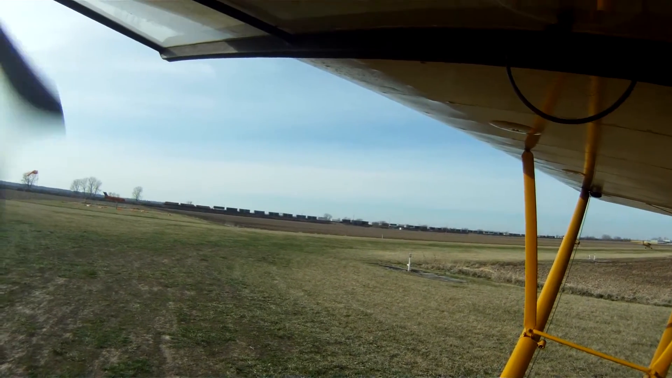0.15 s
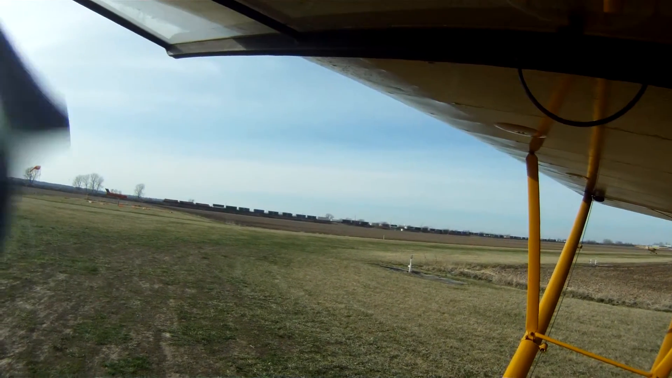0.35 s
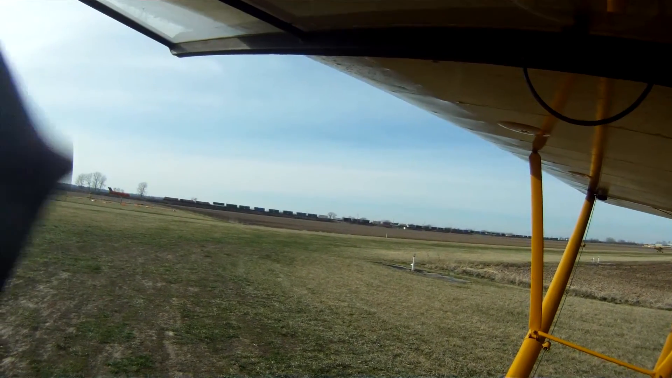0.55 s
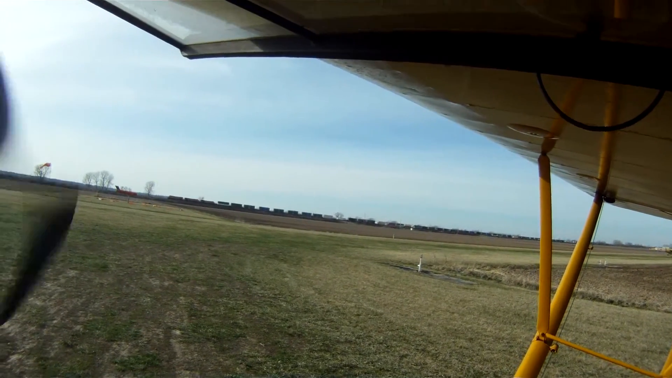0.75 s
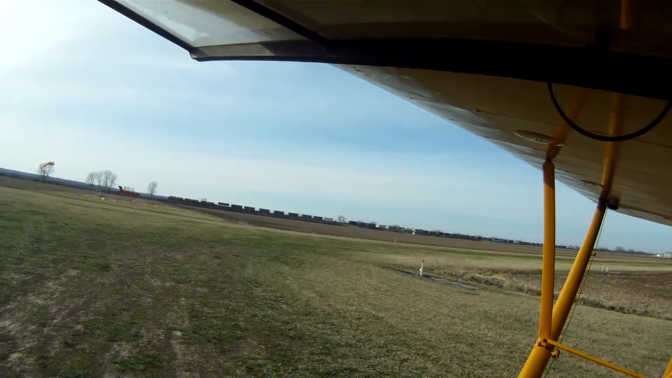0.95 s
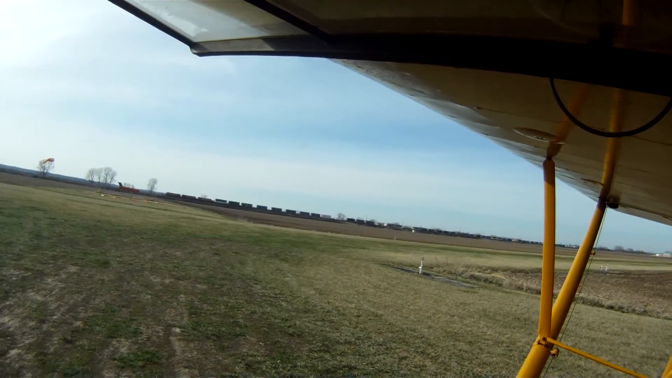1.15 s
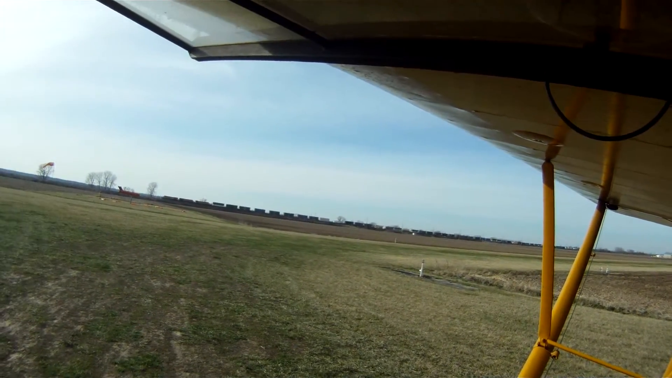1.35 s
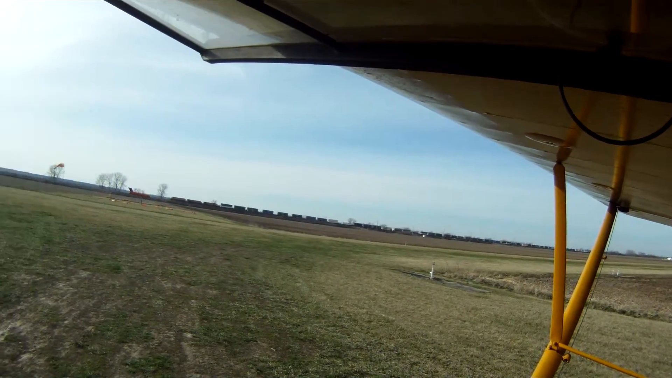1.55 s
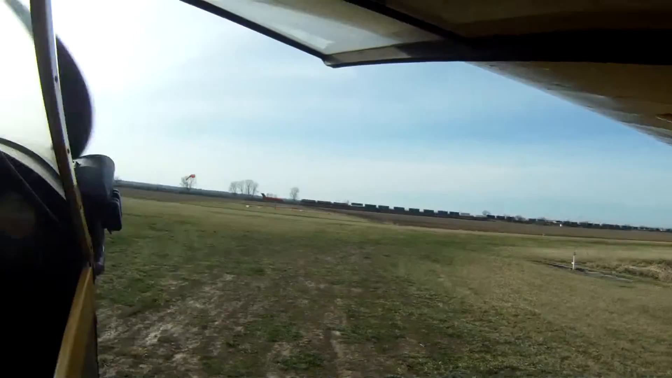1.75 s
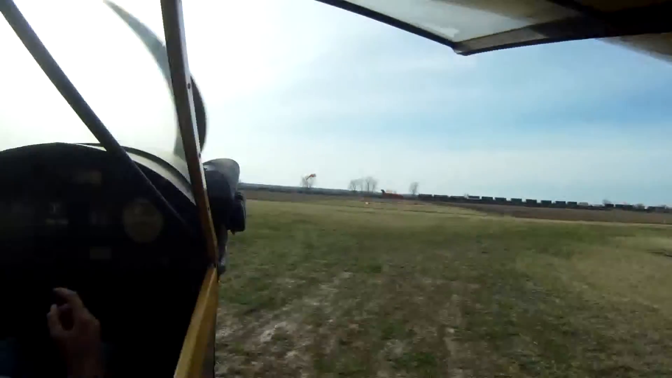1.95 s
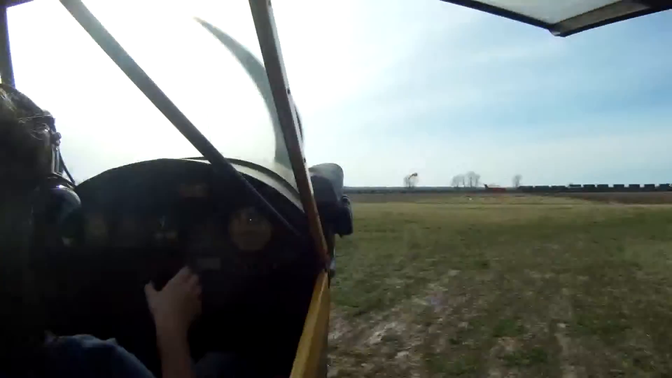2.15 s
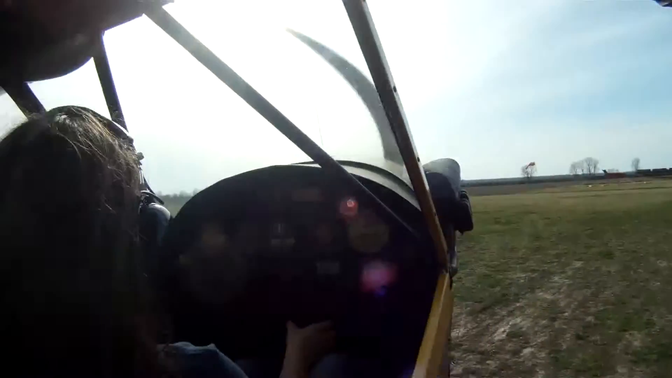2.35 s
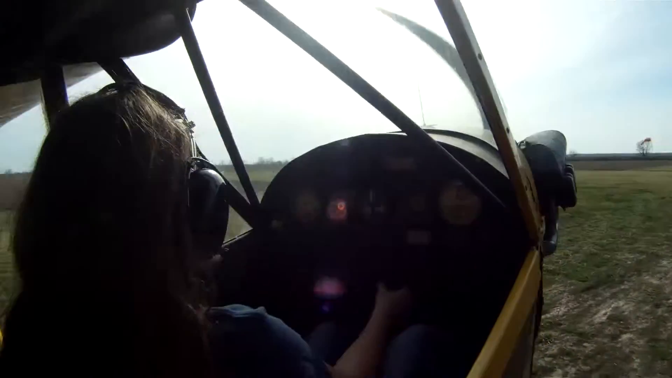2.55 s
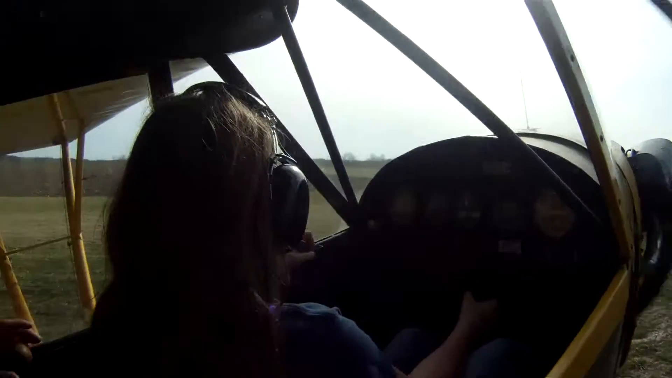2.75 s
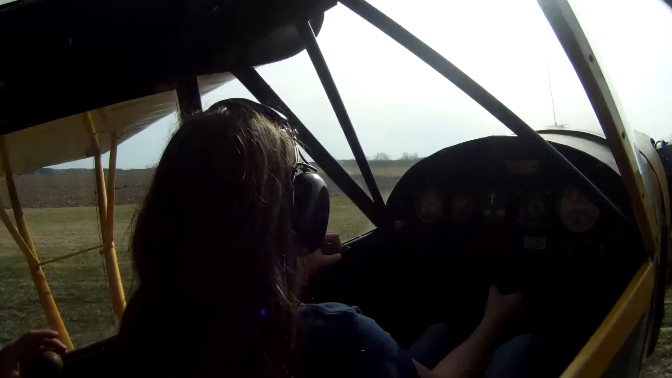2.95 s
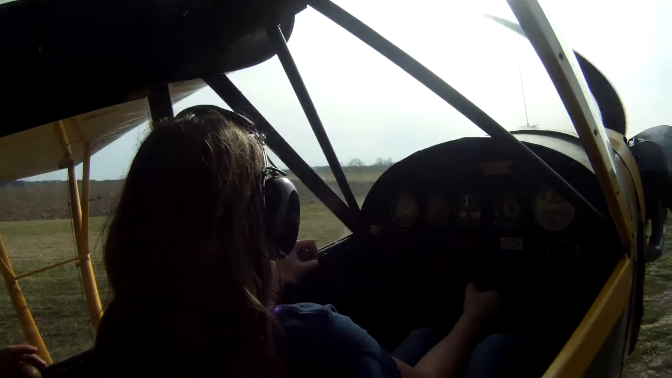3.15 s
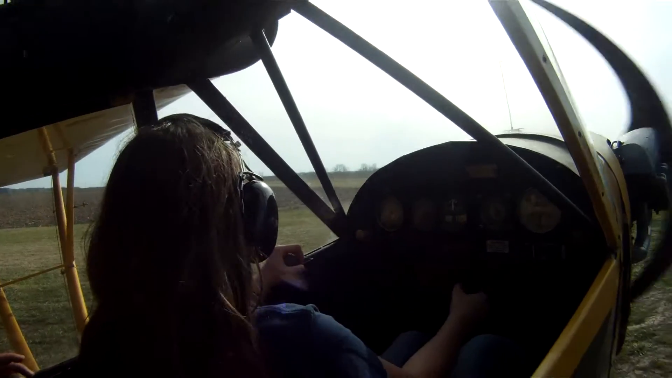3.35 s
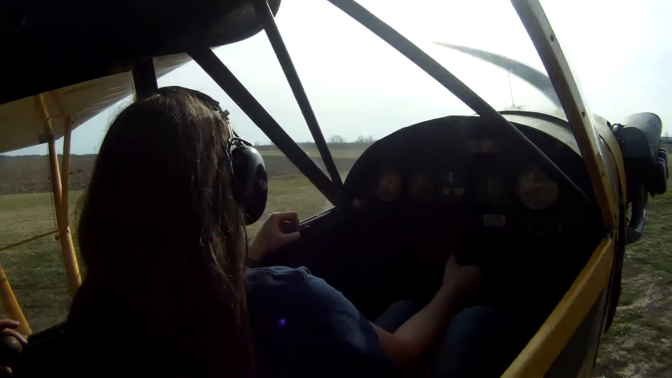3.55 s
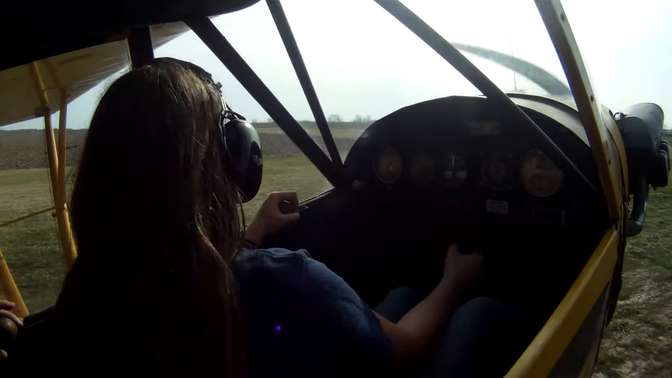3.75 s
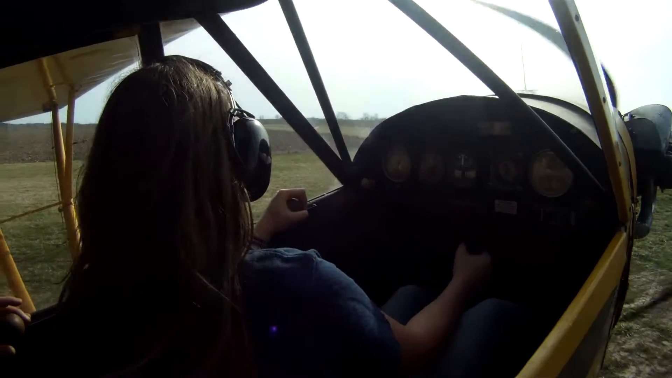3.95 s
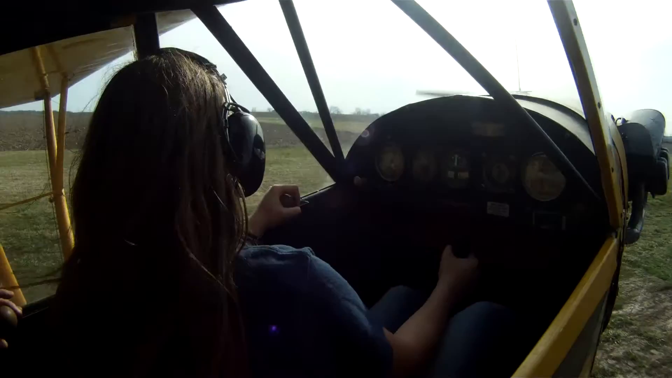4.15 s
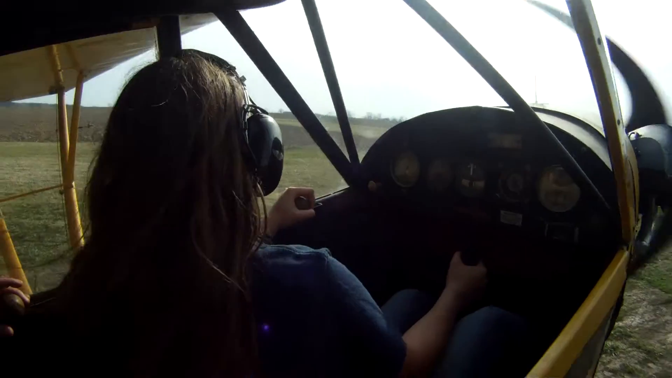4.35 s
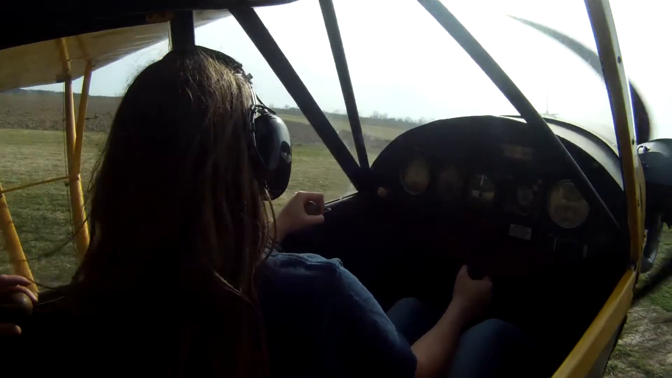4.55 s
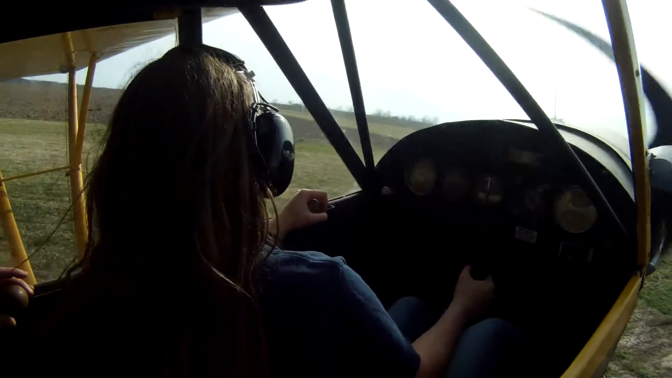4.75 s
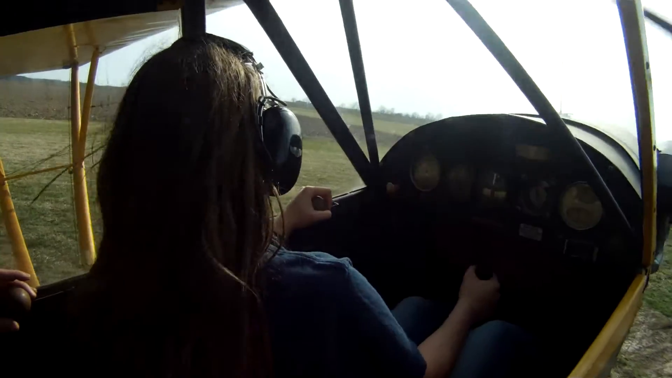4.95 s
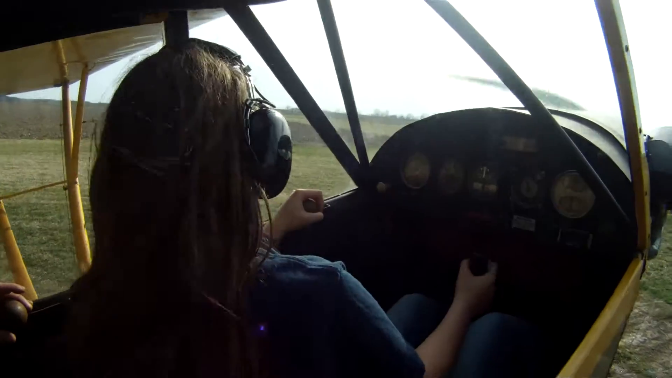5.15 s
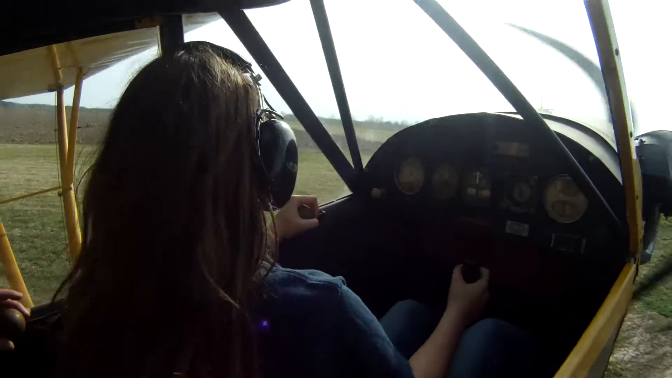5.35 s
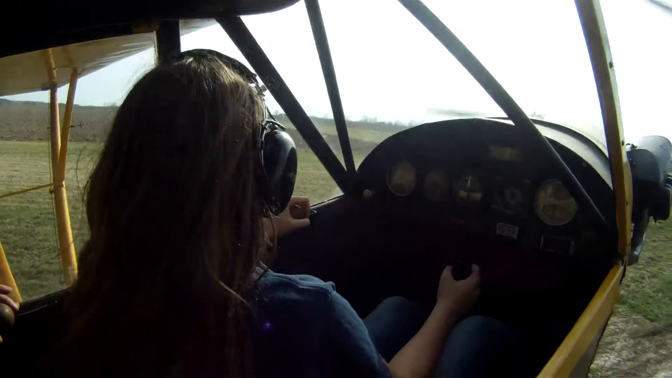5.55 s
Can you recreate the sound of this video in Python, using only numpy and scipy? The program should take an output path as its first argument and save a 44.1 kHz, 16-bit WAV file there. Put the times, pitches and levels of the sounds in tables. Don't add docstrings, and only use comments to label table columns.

```python
import sys
import numpy as np
from scipy import signal
from scipy.fft import rfft, irfft
from scipy.io import wavfile
from scipy.ndimage import uniform_filter1d

SR = 44100
rng = np.random.default_rng(int(sys.argv[2]) if len(sys.argv) > 2 else 0)


def elevation(decibels):
    levels = np.asarray(decibels, float)
    return 10 ** (levels / 20)


def wrap_up_sound(samples):
    columns = np.atleast_2d(samples).T
    tamed = np.clip(columns, -1, 1)
    steps = np.round(tamed * 32767).astype(np.int16)
    wavfile.write(sys.argv[1], SR, steps)


N = 247401


def in_time(rows):
    s, *columns = np.vstack(rows).T
    return [np.interp(np.arange(N) / SR, s, c) for c in columns]


def rms_one(x):
    return x / np.sqrt(np.mean(x ** 2) + 1e-20)


def drift(rate_hz):
    r = np.exp(-2 * np.pi * rate_hz / SR)
    noise = rng.standard_normal(N + SR)
    return rms_one(signal.lfilter([1], [1, -2 * r, r * r], noise)[SR:])


def butter(x, order, hz, kind="low"):
    return signal.sosfilt(signal.butter(order, hz, kind, fs=SR, output="sos"), x)


def resonate(drive, modes, power, noisy=True):
    out = np.zeros(N)
    for k, (hz, width_hz, idle_db, power_db) in enumerate(modes):
        r = np.exp(-np.pi * width_hz / SR)
        x = drive * rng.standard_normal(N) if noisy else (-1) ** k * drive
        ring = [1, -2 * r * np.cos(2 * np.pi * hz / SR), r * r]
        band = signal.lfilter([1 - r * r, 0, r * r - 1], ring, x)
        out += elevation(idle_db + power * (power_db - idle_db)) * band
    return out


def evened(x, level_db):
    return elevation(level_db) * x / np.sqrt(uniform_filter1d(x ** 2, size=SR // 3))


def turned(half_s, length_s, before, after):
    share = .5 + .5 * np.tanh((np.arange(N) / SR - half_s) / max(length_s, .005))
    return before + share * (after - before)


def puffs(turn, once_db, twice_db, lags, uneven_db, grain_db):
    strength = np.clip(1 + .12 * rng.standard_normal(400), 0, 2)[(turn + .45).astype(int)]
    once = once_db * np.cos(2 * np.pi * (turn - lags[0]))
    twice = twice_db * np.cos(4 * np.pi * (turn - lags[1]))
    return elevation(strength * (once + twice) + uneven_db + grain_db * drift(550.0))


# [f/Hz, width/Hz, idle level/dB, power level/dB]
CAVITY_MODES = [(970, 300, -14, -9.5), (1250, 150, -4, 0.5), (1510, 220, -14.5, -8.5)]
PORT_MODES = [(2010, 257, -4.5, -0.5), (2182, 340, -8, -0.5), (2580, 330, -28, -4.5)]


def hiss(turn, power, beat, shared_db, facing):
    cavity = puffs(turn, 3 * beat, beat, (.96, .9), shared_db + .6 * drift(20.), 1.5)
    port = puffs(turn, 1.3 + .7 * power, 1.5 * beat - .6 * power, (.97, .83), shared_db + .6 * drift(20.), 1.5)
    out = facing ** 0.27 * resonate(cavity, CAVITY_MODES, power) + resonate(port, PORT_MODES, power)
    return butter(out, 3, [950, 2700], "band")


# [f/Hz, width/Hz, idle level/dB, power level/dB]
EDGE_MODES = [(3290, 590, -8, 6.5), (3990, 510, -15, 1), (5130, 660, -13.5, -0.5)]
WHISTLE_MODE = [(3650, 150, -2., 10.5)]
# [half-way t/s, length/s, power share before, after]
EDGE_WAKING = (2.15, -1, 0., 0.3)


def edge_tones(turn, power, beat, shared_db, facing):
    drive = puffs(turn, 1.3 * beat, 1.2 * beat, (.17, .26), shared_db + .3 * drift(20.), 2)
    awake = np.maximum(power, turned(*EDGE_WAKING))
    out = resonate(drive, EDGE_MODES, awake) + facing * resonate(drive, WHISTLE_MODE, power)
    return butter(out, 3, 2950, "high")


# [f/Hz, width/Hz, idle level/dB, power level/dB]
FLUTTER_MODES = [(268, 198, 0, 3.5), (550, 440, 0.5, -5.5), (836, 230, -8, 1.5)]


def flutter(turn, power, beat, shared_db):
    uneven_db = .7 * shared_db + .7 * drift(12.)
    drive = puffs(turn, 3.2 * beat - 1.5 * power, beat - .6 * power, (.04, .98), uneven_db, 2.2)
    return butter(resonate(drive, FLUTTER_MODES, power), 2, [180, 1050], "band")


# [start t/s, end t/s, level/dB]
LEVEL_STEPS = [(2.65, 2.735, 1.5), (2.803, 2.818, 2), (3.543, 3.572, -2), (3.678, 3.697, -3.5),
               (3.827, 3.839, -5.), (4.04, 4.048, -5), (4.087, 4.143, 2.), (4.172, 4.195, -5),
               (4.205, 4.206, -33), (4.332, 4.363, -5.), (4.406, 4.417, 4.5), (4.571, 4.572, -31),
               (4.74, 4.755, -8), (4.809, 4.817, -13), (4.851, 4.864, -5.5), (4.94, 4.964, -3.5),
               (4.998, 5.015, -7), (5.071, 5.085, -8), (5.091, 5.103, -13.5), (5.106, 5.15, 0.5),
               (5.15, 5.18, -7.5), (5.204, 5.213, -14), (5.368, 5.385, -9), (5.496, 5.515, -5.5),
               (5.581, 5.62, -6.5)]


def lulls():
    steps_db = np.zeros(N + SR)
    for start, end, change_db in LEVEL_STEPS:
        steps_db[round(start * SR):round(end * SR)] += change_db
    return uniform_filter1d(steps_db[:N], size=SR // 130)


# [t/s, level/dB]
WASH_LEVEL = [(0, -34), (1.0, -34), (2.0, -36.5), (2.3, -36), (2.58, -33), (2.69, -29.5), (2.84, -29),
              (3.1, -27.5), (3.26, -24.5), (3.4, -24), (3.95, -24), (4.35, -21), (4.5, -19), (4.7, -22),
              (4.8, -19.5), (5.15, -21), (5.45, -19.5), (5.61, -20.5)]
# [half-way t/s, length/s, level/dB before, after]
EDGE_BALANCE = (2.5, 1.4, -12.5, -6.5)
FLUTTER_BALANCE = (2, 1.3, -10., -8.5)


def slipstream(turn, power):
    t = np.arange(N) / SR
    shared_db = (.2 + .8 * power) * drift(25.) + .6 * drift(70.)
    beat = np.interp(t, [0, 2.4], [1.4, .75])
    facing = elevation(-10. * np.exp(-((t - 2.84) / .73) ** 2))
    step_gain = elevation(lulls())
    level_db = in_time(WASH_LEVEL)[0] - .2
    out = evened(step_gain * hiss(turn, power, beat, shared_db, facing), level_db)
    edge = step_gain * edge_tones(turn, power, beat, shared_db, facing)
    out += evened(edge, level_db - in_time(WASH_LEVEL)[0] + in_time(WASH_LEVEL)[0] * 0 + turned(*EDGE_BALANCE)
                  + in_time(WASH_LEVEL)[0])
    flaps = step_gain ** 1.1 * flutter(turn, power, beat, shared_db)
    return out + evened(flaps, level_db + turned(*FLUTTER_BALANCE))


def exhaust(turn, power):
    barks = np.zeros(N) + 1e-18
    firing = np.flatnonzero(np.diff(np.floor(turn + .17)))
    uneven_db = 2 * rng.standard_normal(len(firing))
    barks[firing] = elevation(in_time(WASH_LEVEL)[0][firing] + 27 - 5 * power[firing] + uneven_db)
    ring = resonate(barks, CAVITY_MODES + PORT_MODES, power, noisy=False)
    return ring + elevation(-6) * resonate(barks, FLUTTER_MODES, power, noisy=False)


# [multiple of firing rate, idle level/dB, power level/dB], both relative to the buffet
FIRING_ORDERS = [(1, -7., -14.), (1.5, -20., -14.), (2, -10., -18.), (3, -8., -25.), (4, -13., -26.),
                 (6, -16., -30.)]


def firing_hum(turn, power, level_db):
    out = np.zeros(N)
    for order, idle_db, power_db in FIRING_ORDERS:
        order_db = level_db + idle_db + power * (power_db - idle_db) + 3 * drift(3)
        out += elevation(order_db) * np.sin(2 * np.pi * order * turn + order)
    return out


# [half-way t/s, length/s, level/dB before, after]
BUFFET_BALANCE = (1.5, 0.5, -10, -5.)
# [t/s, peak level/dB, push or pull, width/ms]
GUSTS = [(2.577, -14., 1, 2.2), (2.652, -21.0, 1, 2.6), (2.784, -12.5, -1, 2.), (3.014, -19.2, -1, 5.4),
         (3.284, -18.2, -1, 3.2), (3.323, -18.3, 1, 2.5), (3.351, -17.0, 1, 3.3), (3.443, -15.4, -1, 5.6),
         (3.578, -16.4, -1, 3.1), (3.873, -14.6, 1, 2.9), (3.981, -14.6, 1, 2.9), (4.093, -14.7, -1, 3.7),
         (4.365, -12.4, 1, 2.9), (4.429, -10.2, 1, 2.9), (4.524, -12.4, -1, 3.2), (4.777, -10.0, -1, 4.2),
         (4.81, -7.7, 1, 3.3), (4.878, -9.5, -1, 4.4), (4.933, -8.8, -1, 3.9), (5.147, -4.8, 1, 3.0),
         (5.276, -8.8, -1, 3.5), (5.425, -9.8, 1, 2.7), (5.494, -9.6, 1, 3.4), (5.554, -7.5, -1, 4.0),
         (2.798, -12.5, -1, 1.8)]


def pressure_db(power):
    t = np.arange(N) / SR
    lope_db = .5 * (1 - power) ** 4 * np.cos(2 * np.pi * 4.05 * (t - .0056))
    energy = elevation(in_time(WASH_LEVEL)[0] + turned(*BUFFET_BALANCE) + 5 * power + lope_db) ** 2
    for s, peak_db, _, _ in GUSTS:
        wake = np.exp(-np.abs(t - s) / np.where(t < s, .018, .036))
        energy += (elevation(peak_db - 10.5) * wake) ** 2
    return 10 * np.log10(energy)


# [f/Hz, level/dB per Hz]
BUFFET_COLOUR = [(8.8, -39), (15, -8), (54, 2.5), (76, -1.5), (100, -7.5), (139, -5.5), (320, -16),
                 (420, -56)]
# [f/Hz, width/Hz, idle level/dB, power level/dB]
CASE_MODE = [(84, 44, -17.5, -2)]
# [half-way t/s, length/s, level/dB before, after]
TOP_SHELTER = (3.5, -4.3, -6.5, 3.5)


def lumpy_pressure(power):
    hz, shape = np.fft.rfftfreq(N, 1 / SR), np.array(BUFFET_COLOUR)
    colour = elevation(np.interp(np.log(hz + 1), np.log(shape[:, 0]), shape[:, 1], -70., -70.))
    lumps = irfft(rfft(rng.standard_normal(N) * elevation(2.2 * drift(27.0))) * colour, N)
    lumps += resonate(lumps, CASE_MODE, power, noisy=False)
    split_hz = 129
    top = butter(lumps, 2, split_hz, "high")
    return butter(lumps, 2, split_hz) - elevation(turned(*TOP_SHELTER)) * top


def buffet(turn, power):
    level_db = pressure_db(power)
    t, gusts, calm = np.arange(N) / SR, np.zeros(N), np.ones(N)
    for s, peak_db, push, width_ms in GUSTS:
        bump = np.exp(-np.abs((t - s) / (.0006 * width_ms)) ** 1.3)
        gusts += np.sign(push) * elevation(peak_db + .5) * bump
        calm *= 1 - .85 * np.exp(-((t - s) / .013) ** 2)
    out = calm * evened(lumpy_pressure(power), level_db - 0.5) + firing_hum(turn, power, level_db)
    gusts = butter(gusts, 1, 18, "high")
    return out + gusts + resonate(gusts, CASE_MODE, power, noisy=False)


# [t/s, peak level/dB, treble level/dB relative]
TRIM_TICKS = [(0.021, -21, -21), (0.058, -22, -20), (0.379, -21, -22), (0.416, -20, -22), (0.903, -19, -25),
              (1.352, -21, -18), (2.206, -21, -16), (2.391, -19, -23), (2.529, -21, -15), (2.557, -16, -22),
              (2.632, -17, -20), (3.104, -9, -20), (3.256, -6, -24), (3.34, -10, -21), (4.195, -10, -15),
              (4.403, -5, -16), (5.268, -6, -16)]
# [f/Hz, width/Hz, idle level/dB, power level/dB]
TRIM_MODE = [(2060, 250, -7, -4)]


def rattles():
    dull, bright = np.zeros((2, N)) + 1e-18
    for s, peak_db, bright_db in TRIM_TICKS:
        i = round((s + .001) * SR)
        dull[i] = elevation(peak_db + 25.5)
        bright[i] = elevation(peak_db + 35 + bright_db)
    out = resonate(dull, CAVITY_MODES + PORT_MODES, 0, noisy=False)
    out -= resonate(dull, TRIM_MODE, 0, noisy=False)
    return out + resonate(bright, EDGE_MODES, 0, noisy=False)


# [t/s, f/Hz]
BLADE_RATE = [(0, 24.9), (1, 24.85), (2.1, 24.72), (2.6, 25.4), (2.9, 28.3), (3.1, 31.5), (3.3, 36),
              (3.5, 38.8), (3.9, 41), (4.3, 44), (4.7, 45), (5.1, 45.5), (5.61, 48.5)]


def scene():
    per_s, = in_time(BLADE_RATE)
    turn = .32 + np.cumsum(per_s) / SR
    power = np.clip((per_s - 25) / 22, 0, 1)
    return (slipstream(turn, power) + exhaust(turn, power) + buffet(turn, power) + rattles())[None]


def band_limit(x):
    return signal.sosfilt(signal.butter(12, 15770, fs=SR, output="sos"), x)


def record(dry):
    held_hz, play_hz, hold, top_hz = 12000, 48000, 4, 15350
    x = butter(dry, 6, 5500.)
    slow = signal.resample_poly(x, held_hz // 300, SR // 300, axis=1)
    held = np.repeat(1.24 * np.tanh(slow / 1.127), hold, axis=1)[:, hold // 2:]
    x = signal.resample_poly(held, SR // 300, play_hz // 300, axis=1)
    mix = irfft(rfft(x, N) * (np.fft.rfftfreq(N, 1 / SR) < top_hz), N)
    return band_limit(mix)


dry = scene()
out = record(dry)
wrap_up_sound(out)
```